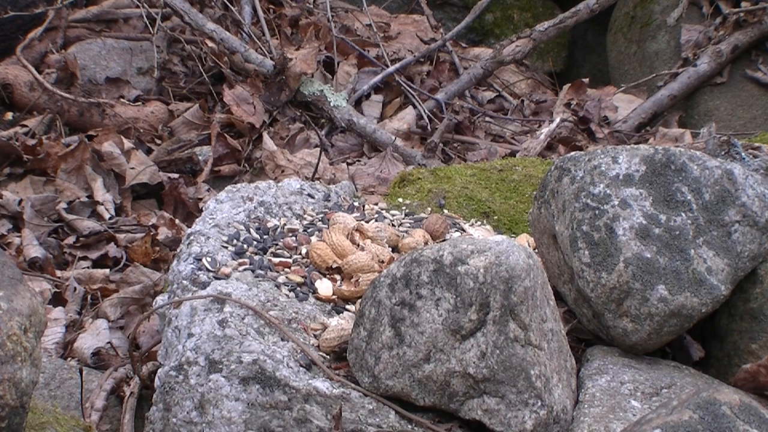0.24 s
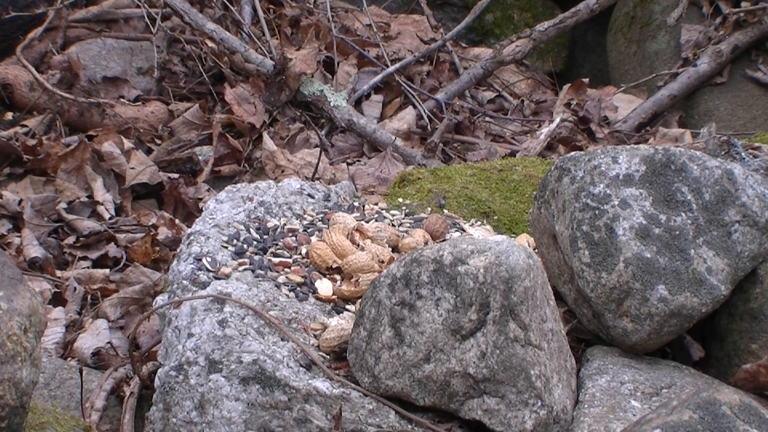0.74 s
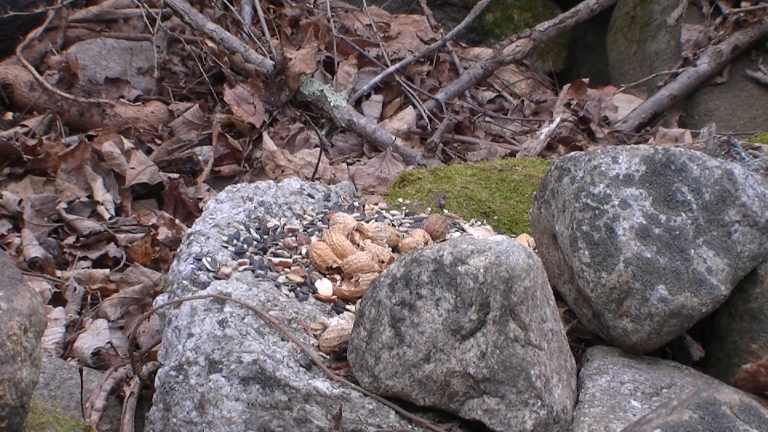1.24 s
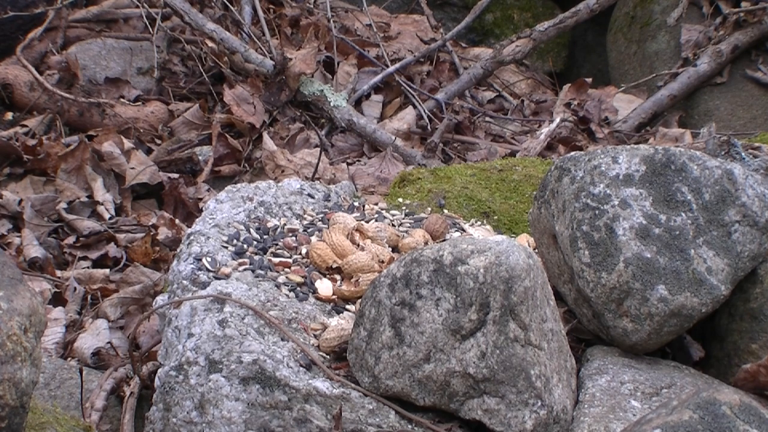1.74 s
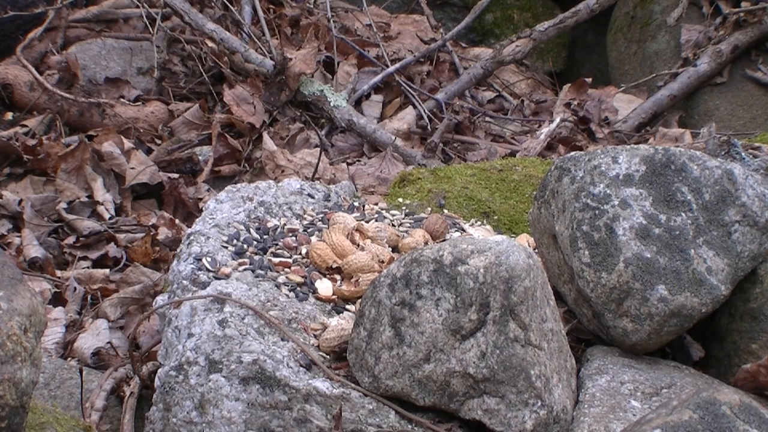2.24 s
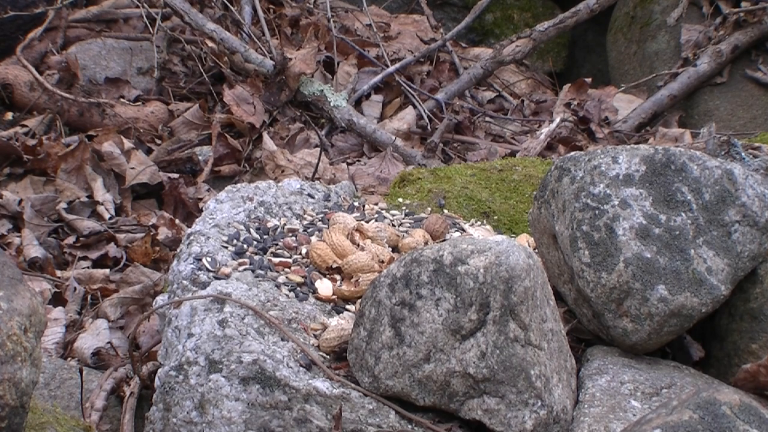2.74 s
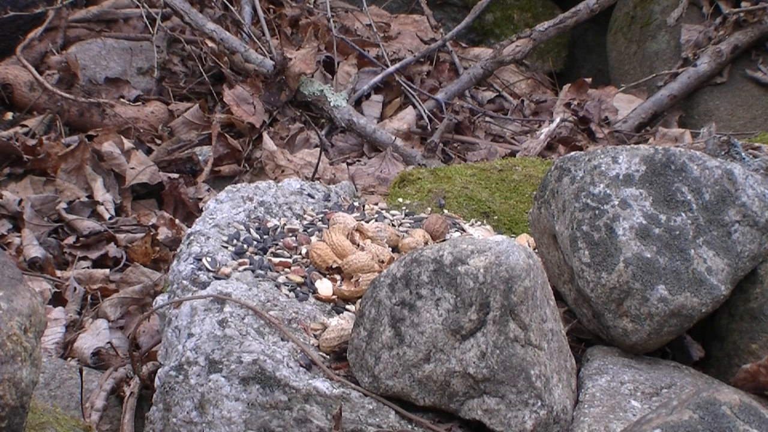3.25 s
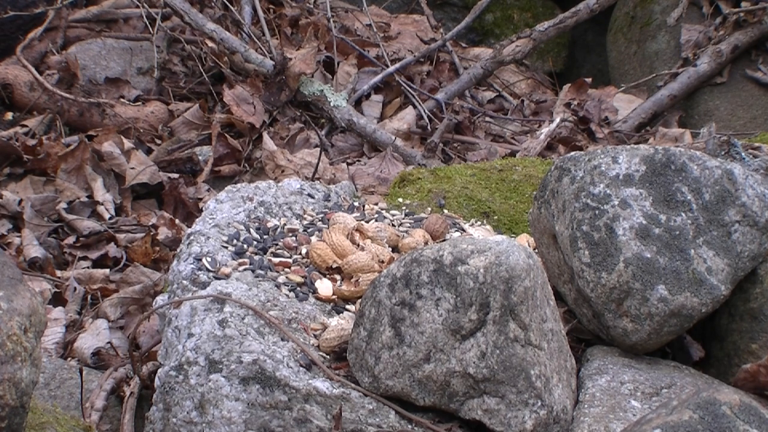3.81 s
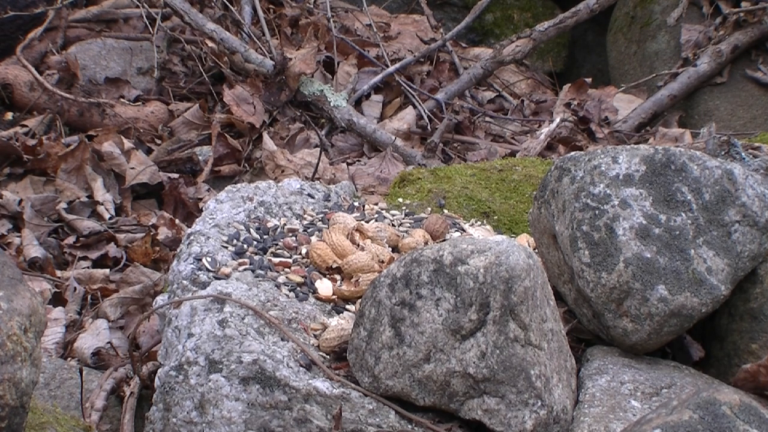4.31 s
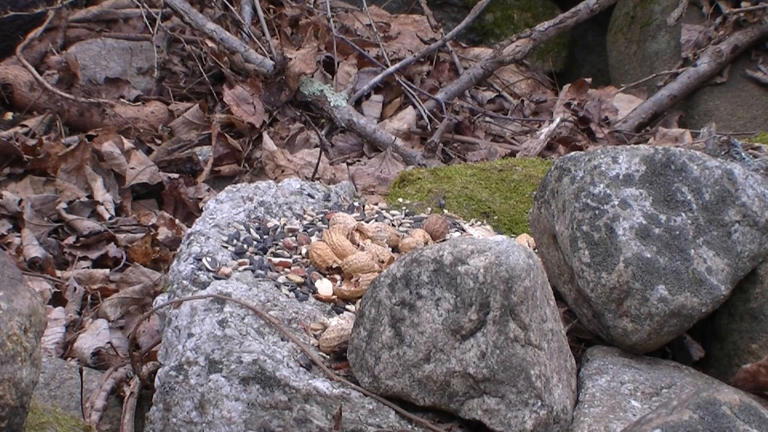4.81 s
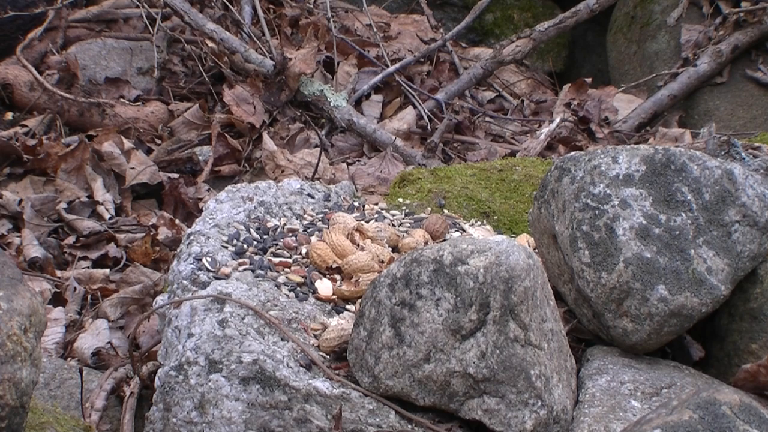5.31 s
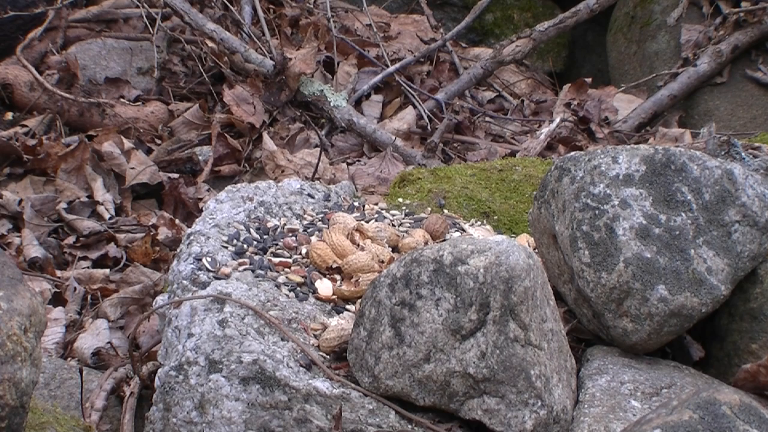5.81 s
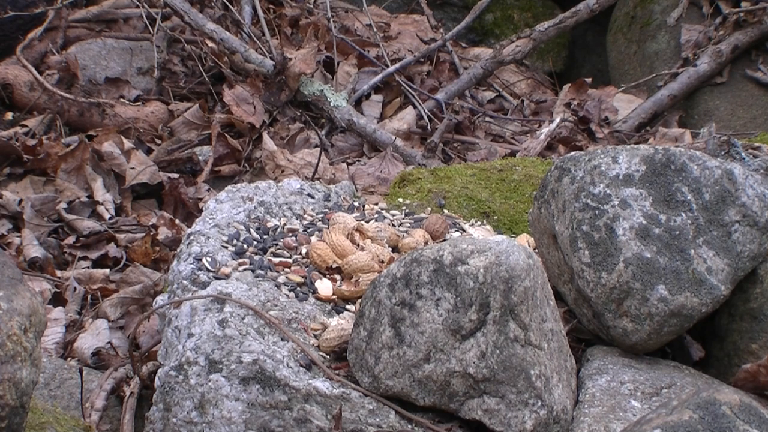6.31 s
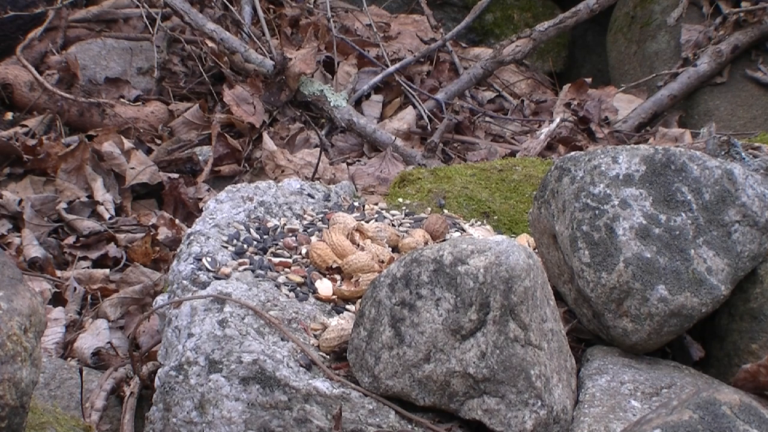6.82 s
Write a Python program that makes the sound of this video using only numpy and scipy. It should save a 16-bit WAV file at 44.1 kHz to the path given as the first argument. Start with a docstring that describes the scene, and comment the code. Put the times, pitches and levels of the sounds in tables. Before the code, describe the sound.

In a quiet wood, something out of sight scuffles through dry leaf litter from the first instant, in rapid flurries of crackle, sharp twig snaps and soft hollow pats. After about three seconds it becomes sparser, with isolated clicks and light rustles. Faint bird chips and thin whistles come late. A distant road and low engine hum continue throughout. Close, slightly left-leaning stereo pickup with little echo.

```python
"""A wood for seven seconds: a far road washes evenly and an engine hums through its gears from the start.
At once something out of sight scuffles through dry leaf litter in flurries: leaves crackle in swarms of tiny
fractures and flick edges, stalks and twigs snap as bursts of fractures that ring and scatter off the ground,
and squeezed air makes hollow pats of filtered noise. After about 3 s the scuffling grows sparser; from 4.3 s
come faint bird chips of filtered noise and thin sliding whistles. The trees add a faint scatter of noise."""
import sys
import numpy as np
from scipy import signal
from scipy.fft import rfft, irfft
from scipy.io import wavfile
from scipy.ndimage import uniform_filter1d

SR = 44100
rng = np.random.default_rng(int(sys.argv[2]) if len(sys.argv) > 2 else 0)


def wav_record(signal):
    """Record a signal, one row per channel, as 16-bit PCM in the file named by sys.argv[1]."""
    frames = np.transpose(np.atleast_2d(signal))
    bounded = np.clip(frames, -1, 1)
    # unit amplitude maps onto the largest positive 16-bit level
    quanta = np.round(bounded * 32767).astype(np.int16)
    wavfile.write(sys.argv[1], SR, quanta)


N = 311345

# where body, middle and edge of a leaf's or stalk's sound lie: (frequency [Hz])
TONE_HZ = [700, 2500, 8000]


def undb(db):
    """Decibels to gain."""
    return 10 ** (np.asarray(db) / 20)


def unit(x):
    """Scale to rms 1."""
    return x / np.sqrt(np.mean(x ** 2) + 1e-20)


def at(hz, points, values):
    """Read a spectrum on a log-frequency axis."""
    return np.interp(np.log(hz + 1), np.log(points), values)


def freqs(n):
    """Frequencies of an n-point spectrum."""
    return np.fft.rfftfreq(n, 1 / SR)


def bump(hz, centre, width):
    """Gain of a resonance, 1 at its centre."""
    return 1 / (1 + (2 * (hz - centre) / width) ** 2)


def ring(x, db):
    """Minimum-phase filter with the given dB at each frequency: it rings only after a blow."""
    n = x.shape[-1]
    cepstrum = irfft(np.log(undb(db)), n)
    # fold the cepstrum forward in time to make the filter causal
    cepstrum[1:n // 2] *= 2
    cepstrum[n // 2 + 1:] = 0
    return irfft(rfft(x) * np.exp(rfft(cepstrum)), n)


def walk(rate):
    """Random levels held 1 / rate s and slewed twice; rms 1."""
    hold = max(int(SR / rate), 2)
    steps = np.repeat(rng.standard_normal(N // hold + 1), hold)
    smooth = uniform_filter1d(uniform_filter1d(steps, hold), hold)
    return unit(smooth[:N])


def pan(db):
    """Left and right gains of constant power for a left-minus-right level in dB."""
    return unit(undb(np.array([[db], [-db]]) / 2))


def from_left(x, lag=0.85):
    """The same sound at both ears, a fraction of a sample later on the right."""
    delay = np.array([[0], [lag]]) / SR
    return irfft(rfft(x) * np.exp(-2j * np.pi * freqs(len(x)) * delay), len(x))


def diffuse(n, wide_hz=5000):
    """Noise from all around: nearly alike in both ears in the bass, unrelated in the treble."""
    mid, side = rfft(rng.standard_normal((2, n)))
    apart = np.minimum(freqs(n) / wide_hz + 0.15, 1)
    return irfft((mid + np.array([[1], [-1]]) * apart * side) / np.sqrt(1 + apart ** 2), n)


def add(out, s, x):
    """Mix x into out from time s."""
    i = max(int(s * SR), 0)
    out[..., i:i + x.shape[-1]] += x[..., :N - i]


def fractures(n, rate, spread_db):
    """Tiny breaks at random moments (rate per second), most small and a few large."""
    breaks = rng.random(n) < rate / SR
    size_db = spread_db * np.minimum(rng.exponential(size=n), 4)
    return breaks * rng.choice([-1, 1], n) * undb(size_db)


def stirring():
    """Litter's level, body and edge in dB: each shove attacks, holds and releases, then the leaves settle."""
    # shoves through the leaves, in flurries:
    # (start [s], hold [s], level [dB], body [dB], edge [dB])
    shoves = [(0, 0.056, -50.5, 0, -1), (0.104, 0.21, -46, 5, -.5), (.32, 0.029, -40.5, 7, -0.5),
              (.40, 0.038, -41, 4.5, -0.5), (0.483, 0.0087, -41, 4.5, -3.5), (.545, 0.055, -45.5, 3.5, 0),
              (.65, 0.046, -54, 3, -7), (.90, 0.14, -52.5, 5.5, -1), (1.09, 0.14, -51, 5.5, -4),
              (1.205, .15, -46, 5.5, -3), (1.395, 0.022, -47, 6, -1), (1.474, 0.081, -47.5, 7, -4),
              (1.709, 0.17, -50.5, 2, -3), (1.90, 0.1, -47, 3, -5), (2.059, .13, -48, 4, -5),
              (2.237, 0.029, -41, -2, -3), (2.33, .26, -52, 5.5, -12), (2.62, 0.16, -52, 4, -5),
              (2.804, 0.015, -44.5, 1.5, -5.5), (2.91, 0.27, -59.5, 9, -7), (3.27, .08, -54, 2, -2),
              (3.53, 0.025, -51.5, -8, -13), (3.79, .02, -59, -1, -2), (3.865, .21, -56, 5, -2),
              (4.125, 0.012, -58, 1, -2), (5.165, 0.23, -55.5, -5, -6.5), (5.471, .34, -58, 2, -7),
              (5.56, 0.044, -53, 0, -10), (5.825, 0.03, -52, 2, -3), (5.985, 0.025, -57, -2, -2),
              (6.08, 0.073, -56, 1, -5), (6.38, 0.38, -63, -6, -9.5), (6.72, 0.18, -60.5, 1, -4)]
    attack_s, release_s = 0.0043, 0.052
    # a few leaves keep settling: level under the shove, time constant of the decay
    settle_db, settle_s = -9.5, 0.21
    t = np.arange(N) / SR
    power, body, edge = np.full(N, 1e-12), 0, 0
    for start, hold, db, body_db, edge_db in shoves:
        after = np.maximum(t - start - hold, 0)
        settling = undb(settle_db) * np.exp(-after / settle_s)
        fall = np.maximum(np.exp(-after / release_s), settling)
        attack = np.clip((t - start) / attack_s, 0, 1)
        shove = (undb(db) * attack * fall) ** 2
        power = power + shove
        body = body + shove * body_db
        edge = edge + shove * edge_db
    # tone is averaged over the shoves by their power
    return 10 * np.log10(power), body / power, edge / power


def rustle(db, body_db, edge_db, rate=2000, spread_db=3.5, rub=0.95, patchy_db=1.7, own_db=1.93,
           gain_db=-0.17, pan_db=4.0):
    """Leaves crackle and rub in small fits; pressed leaves add body, light touches add edge."""
    # colour of the stirred leaves: (frequency [Hz], level [dB])
    leaf_colour = [(40, -32), (120, -9), (250, -10.5), (440, 0), (900, -2.5), (1800, -0.5), (3000, -1.5),
                   (5000, -2), (8000, 0), (11000, 1), (13500, -4.5), (16000, -21)]
    hz = freqs(N)
    breaks = fractures(N, rate, spread_db)
    fits = undb(patchy_db * walk(110))
    colour = undb(at(hz, *np.transpose(leaf_colour)))
    rubbing = rub * diffuse(N)
    bands = []
    for share in np.eye(3):
        # body, middle and edge each weigh the breaks afresh and waver on their own
        grains = from_left(unit(breaks * rng.rayleigh(size=N))) + rubbing
        band = irfft(rfft(grains * fits) * colour * at(hz, TONE_HZ, share), N)
        bands.append(band * undb(own_db * walk(160)))
    body, middle, edge = bands
    # the level is set by the crisp part, above the body
    crisp = np.sqrt(np.var(middle) + np.var(edge) * undb(edge_db) ** 2)
    leaves = body * undb(body_db) + middle + edge * undb(edge_db)
    return leaves / crisp * undb(db + gain_db) * pan(pan_db)


def ticks(stir_db, count=380, over_db=-6.0, scatter_db=-0.5, decay=0.0023, size=512):
    """Single leaf edges flick past each other, each at its own pitch, louder the more the litter is stirred."""
    out, t, hz = np.zeros((2, N)), np.arange(size) / SR, freqs(size)
    for when, pitch, force, side in rng.random((count, 4)):
        centre = 2000 + 10000 * pitch
        resonance_db = 20 * np.log10(bump(hz, centre, 1.17 * centre))
        flick = ring(rng.standard_normal(size) * np.exp(-t / decay), resonance_db)
        db = stir_db[int(when * N)] + over_db + scatter_db * min(-np.log(1 - force), 3)
        level = np.sqrt(decay * SR / size) * undb(db)
        add(out, when * N / SR, from_left(unit(flick)) * level * pan(5 * side))
    return out


def crunches(stir_db, over_db=4.0, scatter_db=3.0, quickest_s=0.00151, slow_body_db=5.5, edge_db=-1.0,
             lowest_hz=480, octaves=2.53, count=70):
    """Small stalks give way at random, louder the harder they are shoved; slow crunches have more body."""
    stalks = []
    for when, force, slow, pitch in rng.random((count, 4)):
        db = stir_db[int(when * N)] + over_db + scatter_db * (2 * force - 1)
        rise = quickest_s * (1 + 2 * slow)
        ring_hz = lowest_hz * 2 ** (octaves * pitch ** 2)
        stalks.append((when * N / SR, db, rise, slow_body_db * slow, edge_db, ring_hz))
    return stalks


def cracks(snaps, rate=7000, spread_db=4, fibre=0.42, main_break=0.27,
           ring_db=5, ring_width_hz=340, overtone_db=1.5, twig_hz=1800, knock_hz=870, knock_db=4,
           litter_db=-9, litter_t60=0.093, stones_db=-17, stones_t60=0.24, pan_db=4.5, size=8192):
    """Each snap is an avalanche of fractures around one main break, then scatters off the ground."""
    # colour of a snap: (frequency [Hz], level [dB])
    snap_colour = [(40, -44), (130, -17), (240, -12), (440, -5), (850, -0.5), (1800, 1.5), (3000, 0),
                   (5000, -1.5), (8000, 2), (11000, 2.5), (13500, -4), (16000, -3)]
    out, t, hz = np.zeros((2, N)), np.arange(size) / SR, freqs(size)
    for s, db, rise, body_db, edge_db, ring_hz in snaps:
        rise = max(rise, .0004)
        splinters = from_left(unit(fractures(size, rate, spread_db))) + fibre * diffuse(size)
        burst = unit(splinters * t / rise * np.exp(-t / rise))
        # a brittle piece gives way at once; a slow crunch has hardly any main break
        give = rng.standard_normal(size) * np.exp(-((t - .8 * rise) / .00012) ** 2)
        burst = unit(burst + main_break * min(.002 / rise, 1) * from_left(unit(give)))
        # litter and stones: T60 is the time to fall by 60 dB
        for echo_db, t60 in (litter_db, litter_t60), (stones_db, stones_t60):
            decay = (1 - np.exp(-t / rise)) * np.exp(-np.log(1000) * t / t60)
            burst = burst + undb(echo_db) * unit(diffuse(size) * decay)
        # the broken piece rings briefly in its bending modes
        modes = ring_db * bump(hz, ring_hz, ring_width_hz)
        modes = modes + overtone_db * bump(hz, 1.67 * ring_hz, 2 * ring_width_hz)
        if ring_hz > twig_hz:  # a stiff twig also knocks at a lower mode
            modes = modes + knock_db * bump(hz, knock_hz, ring_width_hz / 2)
        tone_db = at(hz, *np.transpose(snap_colour)) + at(hz, TONE_HZ, [body_db, 0, edge_db])
        snap = ring(burst, tone_db + modes)
        # the level refers to about twice the rise time
        level = np.sqrt(2 * rise * SR / size) * undb(db)
        add(out, s, unit(snap) * level * pan(pan_db))
    return out


def tilted(x):
    """Tilts the litter's balance: its lows go to the right, while its high treble keeps its lean to the left."""
    # shift of the litter's balance: (frequency [Hz], left minus right [dB])
    balance = [(250, -10), (1000, -2.5), (2200, -3), (4500, -4), (8000, 0), (13000, -0.5)]
    tilt_db = np.array([[1], [-1]]) * at(freqs(N), *np.transpose(balance)) / 2
    return irfft(rfft(x) * undb(tilt_db), N)


def puffs(table, rise, width_hz, overtone_db, ratio, size=4096):
    """Short swells of noise through a resonance and its overtone."""
    out, t, hz = np.zeros(N), np.arange(size) / SR, freqs(size)
    swell = (t / rise) ** 2 * np.exp(2 - 2 * t / rise)
    for s, db, centre in table:
        shape = bump(hz, centre, width_hz) + undb(overtone_db) * bump(hz, ratio * centre, width_hz)
        puff = irfft(rfft(rng.standard_normal(size)) * shape) * swell
        add(out, s, unit(puff) * np.sqrt(np.mean(swell ** 2)) * undb(db))
    return out


def pats():
    """Air squeezed from under the leaves gives a dull, hollow note."""
    # soft pats on the litter: (time [s], level [dB], pitch [Hz])
    soft_pats = [(.395, -40.5, 378), (.428, -43.5, 750), (.574, -44, 546), (1.408, -43, 751),
                 (2.005, -48.5, 470), (2.24, -54, 530), (2.286, -44.5, 555), (2.35, -50, 527),
                 (2.49, -49, 513), (2.532, -51, 526), (2.578, -45, 555), (2.61, -56, 500), (2.81, -49, 520)]
    return puffs(soft_pats, rise=.009, width_hz=130, overtone_db=-14, ratio=2.1) * pan(.5)


def glide(start, end, from_hz, to_hz, db, waver, waver_rate, fading_db, edge):
    """A far sine tone that slides in pitch, wavers, and fades in and out at random."""
    n = min(int((end - start) * SR), N)
    hz = np.linspace(from_hz, to_hz, n) * (1 + waver * walk(waver_rate)[:n])
    tone = np.sin(2 * np.pi * np.cumsum(hz) / SR) * undb(fading_db * walk(8.87)[:n])
    out = np.zeros(N)
    add(out, start, unit(tone) * signal.windows.tukey(n, edge) * undb(db))
    return out


def birds():
    """Short hoarse chips of resonant noise, and thin falling whistles with a fast buzz in their pitch."""
    # distant chips: (time [s], level [dB], pitch [Hz])
    chip_notes = [(4.305, -63, 2600), (4.325, -57, 2070), (5.078, -58.5, 2420), (5.492, -51, 1980),
                  (5.553, -51, 2030), (5.73, -47.5, 1510), (5.902, -52.5, 1580)]
    # thin far whistles: (start [s], end [s], start pitch [Hz], end pitch [Hz], level [dB])
    whistle_notes = [(4.63, 4.7, 7850, 7500, -72), (4.8, 4.94, 7550, 7080, -73),
                     (5.85, 6.0, 7450, 7000, -68)]
    chips = puffs(chip_notes, rise=0.011, width_hz=380, overtone_db=-8, ratio=1.35)
    whistles = sum(glide(*note, waver=.022, waver_rate=600, fading_db=2, edge=.6) for note in whistle_notes)
    return (chips + whistles) * pan(1)


def woods(x, trees_db=-21, trees_t60=1.0):
    """Direct sound, then a faint decaying scatter from the trunks."""
    t = np.arange(SR // 2) / SR
    scatter = diffuse(len(t)) * np.exp(-np.log(1000) * t / trees_t60)
    response = unit(scatter) / np.sqrt(len(t))
    return x + undb(trees_db) * signal.fftconvolve(x, response, axes=1)[:, :N]


def engine():
    """Only the low hum of the engine carries this far: sliding tones that overlap from gear to gear."""
    # pulls through the gears: (start [s], end [s], start pitch [Hz], end pitch [Hz], level [dB])
    gear_pulls = [(0, .895, 150, 154.4, -73.5), (.8, 2.246, 151.6, 170.7, -67.5),
                  (2.1, 3.996, 149.6, 171.6, -68.5), (2.6, 4.014, 111.3, 123, -74.5),
                  (3.9, 5.3, 140, 150, -78), (5.2, 7.064, 150.2, 164.2, -71.5), (5.2, 6.3, 112.9, 133, -78)]
    hum = sum(glide(*pull, waver=0.006, waver_rate=57, fading_db=2.5, edge=0.096) for pull in gear_pulls)
    return hum * pan(-1.6)


def air(road_db=-54.6, flicker_db=0.2, bass_pan_db=-4):
    """A far road's even wash of noise with a fine hiss, most alike in both ears in the bass."""
    # far road and air: (frequency [Hz], relative level per Hz [dB], left-right likeness [0-1])
    road_colour = [(25, -39, .5), (46.7, -23.5, 1), (77, -11, 1), (115, -6.5, 0.67), (215, -8.5, 0),
                   (344, -7, 0), (534, -3.5, 0), (890, -1.5, 0.24), (1120, -4, 0.16), (1810, -11, 0),
                   (4700, -19, 0), (7700, -19, 0), (10300, -20.5, 0.04), (16000, -29.5, 0.1)]
    hz = freqs(N)
    points, db, likeness = np.transpose(road_colour)
    alike = np.clip(at(hz, points, likeness), 0, 1)
    mid, side = rfft(rng.standard_normal((2, N))) * undb(at(hz, points, db))
    ears = np.array([[1], [-1]])
    # the bass leans right
    tilt = undb(ears * at(hz, [110, 450, 1200, 3000], [bass_pan_db, -.5, 1.5, .3]) / 2)
    wash = irfft((mid * np.sqrt(1 + alike) + ears * side * np.sqrt(1 - alike)) * tilt, N)
    return unit(wash) * undb(road_db + flicker_db * walk(9.5))


def scene():
    """Litter and birds among the trees, over the far road."""
    # stalks and twigs snapping:
    # (time [s], level [dB], time to the peak [s], body [dB], edge [dB], ring of the stalk or leaf [Hz])
    stalk_snaps = [(.0072, -26.5, 0.00068, -7.5, -9.5, 2050), (.1409, -37.5, 0.0038, 4, -11, 1960),
                   (.2079, -39, 0.0017, -2, 3, 730), (.241, -30, .0024, 5, -1.5, 740),
                   (.275, -31.5, .0009, -4, 1, 3340), (.3252, -25.5, 0.0017, 8, 5, 456),
                   (.3516, -34, 0.0029, 9, -4, 720), (.3963, -23, 0.002, -5, -5.5, 3400),
                   (.4062, -38, 0.0027, 8, 6, 431), (.4169, -32.5, .0018, -3, 0, 1210),
                   (.4253, -25, 0.0013, -3, 2.5, 720), (.5411, -32.5, 0.00433, 9.5, -1.5, 1980),
                   (.5752, -34.5, 0.0023, 3, -5, 585), (.6523, -39.5, 0.0023, 6, -1, 536),
                   (1.2146, -29.5, .004, 6, -2.5, 1490), (1.2347, -33, 0.0025, -1, 1, 2100),
                   (1.2595, -41, .0016, -9, -3, 1220), (1.2819, -25, 0.0032, 5, -2.5, 2300),
                   (1.3433, -37.5, .0026, 16, -3, 790), (1.4135, -40.5, 0.0024, 11, -12, 730),
                   (1.5196, -28, 0.0014, -1, -5, 3350), (1.526, -32, .002, 4, -2, 3200),
                   (1.536, -39, .0015, 5, 0, 1650), (1.866, -27, 0.0025, 2, -2.5, 806),
                   (1.9775, -42, .0015, -9, 7, 2420), (2.0974, -31, 0.0023, 1, -0.5, 2040),
                   (2.143, -34.5, 0.001, -1, -2, 2330), (2.1756, -29, .002, 1, -0.5, 690),
                   (2.1862, -29, 0.0025, 2.5, 0, 720), (2.256, -32.5, 0.0018, -16, -1, 540),
                   (2.334, -36.5, 0.0027, -1, -9, 2300), (2.3557, -36.5, 0.0017, -2, -4, 540),
                   (2.3906, -21.5, .0019, 1, -4, 2670), (2.3988, -32.5, 0.0017, -7, -3, 1860),
                   (2.4495, -34, .0015, -11, 0, 590), (2.5123, -30.5, 0.002, -15, -4, 2730),
                   (2.5371, -28.5, 0.0025, -2.5, 1, 520), (2.583, -30, 0.0017, -2.5, -6, 550),
                   (3.0902, -46.5, .0019, -8, 20, 470), (3.1817, -38, 0.0011, -4, -2, 3590),
                   (3.2726, -37.5, 0.00085, 9, 7, 2250), (3.3053, -45, 0.0029, -2, -16, 1690),
                   (3.3166, -39, 0.0032, -3, -3.5, 1710), (3.535, -42.5, 0.0066, -7, -4, 2480),
                   (3.7334, -19.5, 0.0011, -8.5, -4.5, 3000), (3.796, -34.5, 0.0015, -4, 0.5, 2730),
                   (3.99, -33, 0.0033, 4.5, 0, 2260), (4.0424, -41, .0014, 14, 23, 850),
                   (4.0726, -43.5, 0.0012, 12, 18, 790), (5.1675, -46, 0.0015, -8, -7, 2800),
                   (5.2801, -30, 0.0036, 1, -8, 1960), (5.321, -43.5, .0036, 7, -12, 660),
                   (5.3723, -35, 0.0011, 1, -2.5, 1200), (5.5827, -24.5, 0.0026, -4, -0.5, 1520),
                   (5.8287, -27.5, 0.00045, -11, -2.5, 2720), (5.834, -37, .004, 4, -5, 2200),
                   (6.0883, -45, .0007, 10, -5, 850), (6.399, -50, 0.0015, -2, -9, 2400),
                   (6.626, -49, 0.0022, 8, -5, 2100), (6.7487, -50, 0.0012, 1, 19, 910)]
    stir_db, body_db, edge_db = stirring()
    litter = rustle(stir_db, body_db, edge_db) + ticks(stir_db)
    litter = litter + cracks(stalk_snaps + crunches(stir_db))
    return woods(tilted(litter) + pats() + birds()) + engine() + air()


def record(dry):
    """A steep low-pass filter cuts the top of the treble."""
    top_hz = 15900
    lowpass = signal.ellip(10, .2, 70, top_hz, fs=SR, output="sos")
    return signal.sosfilt(lowpass, dry)


dry = scene()
out = record(dry)
wav_record(out)
```